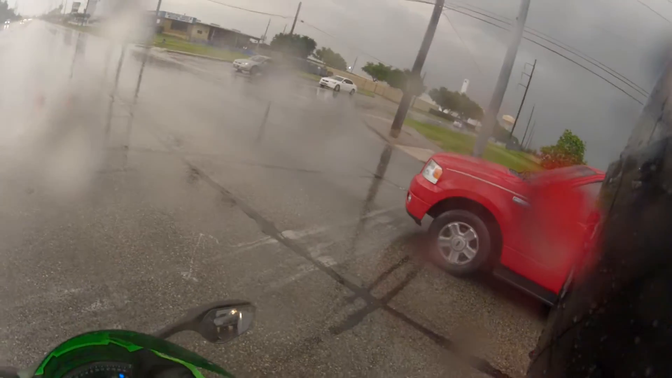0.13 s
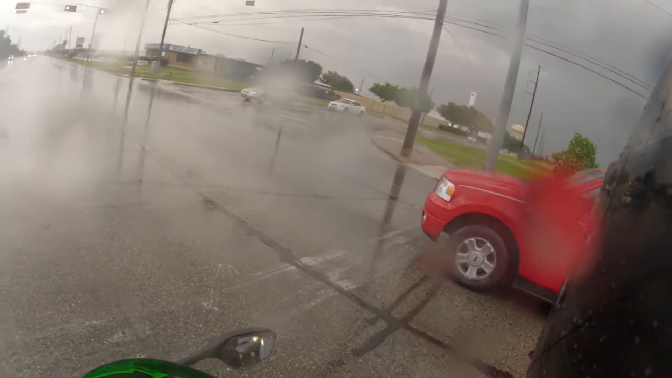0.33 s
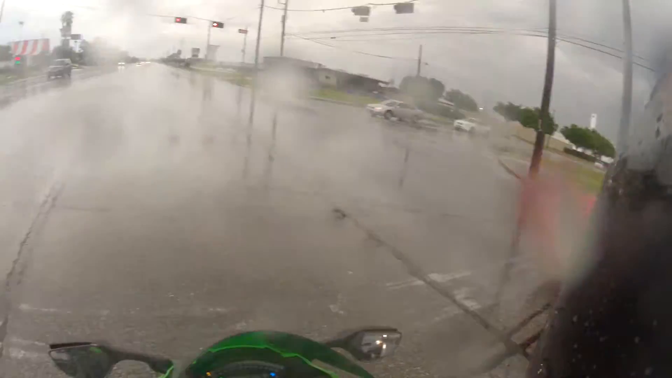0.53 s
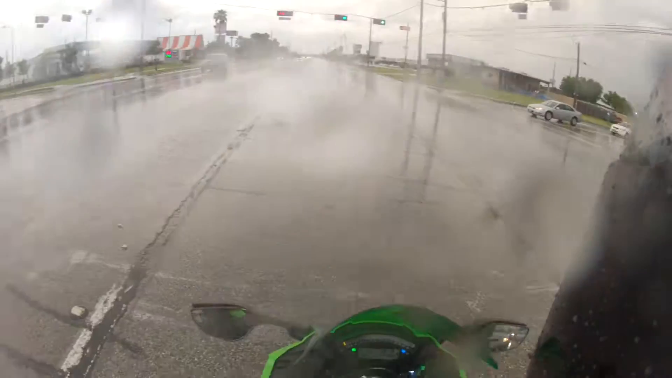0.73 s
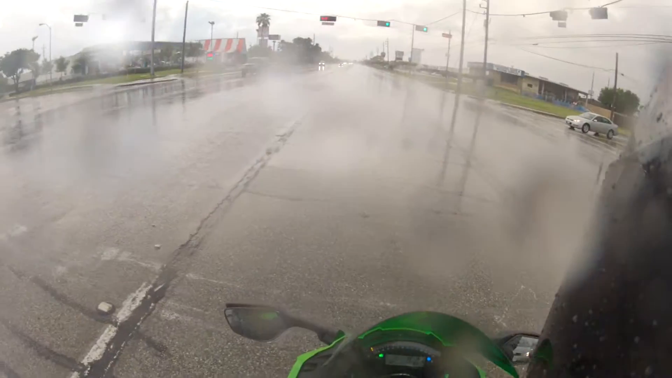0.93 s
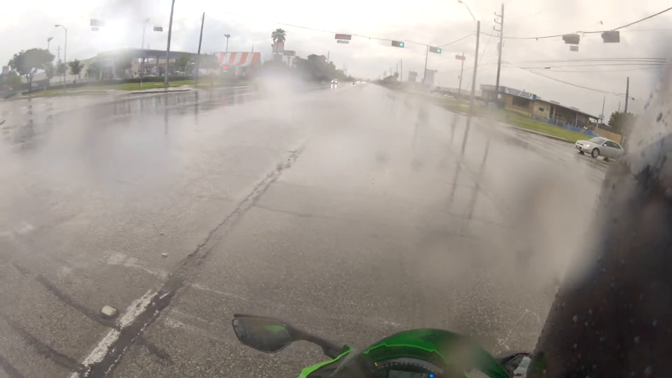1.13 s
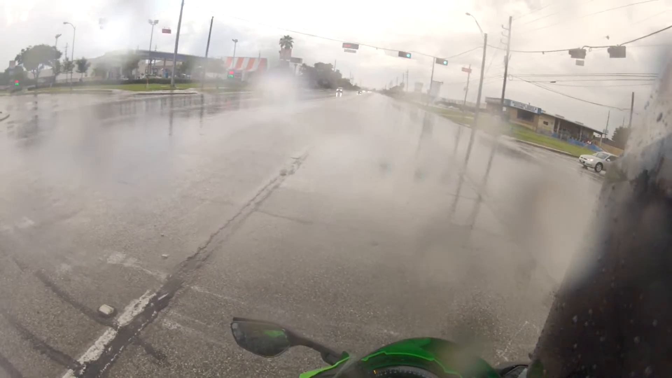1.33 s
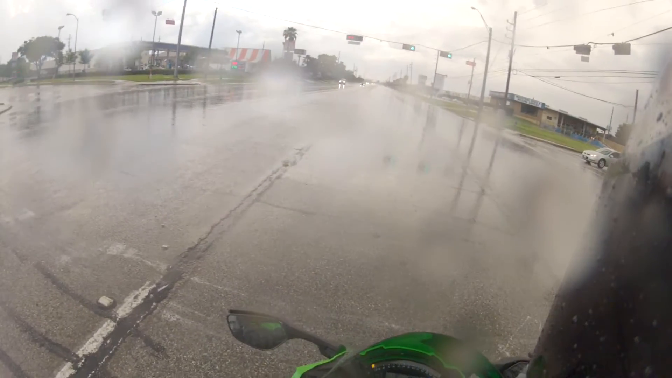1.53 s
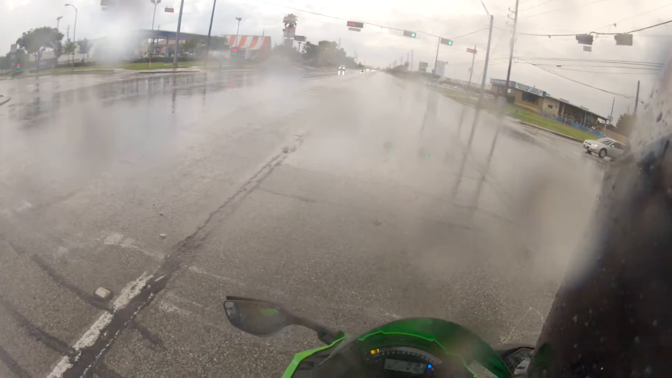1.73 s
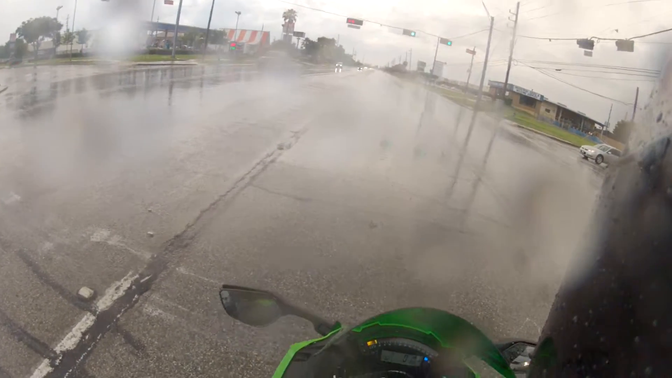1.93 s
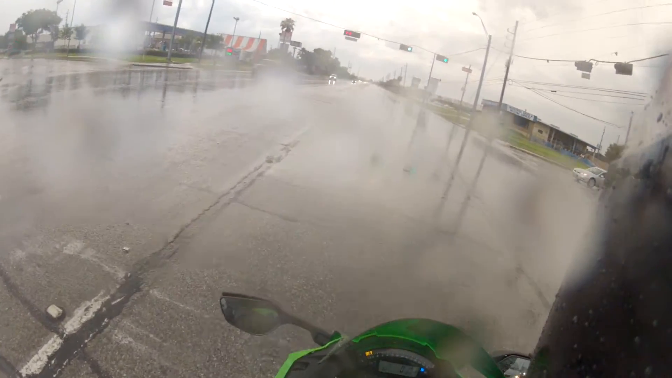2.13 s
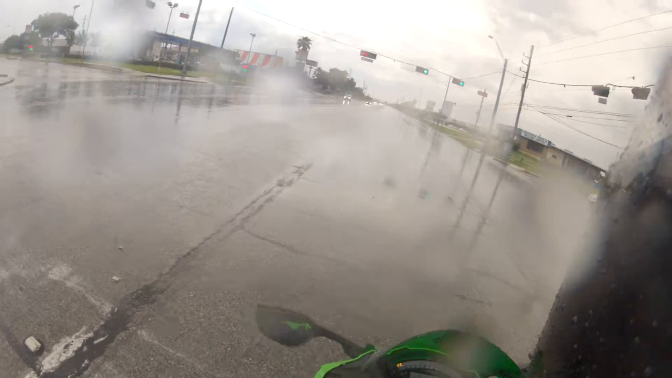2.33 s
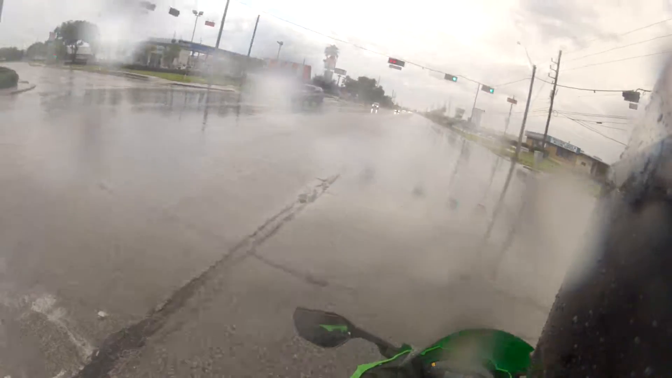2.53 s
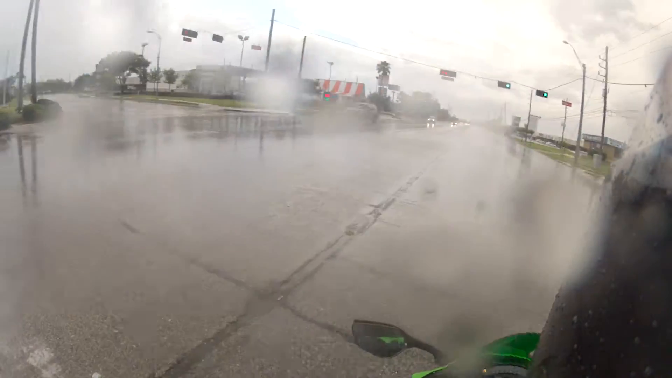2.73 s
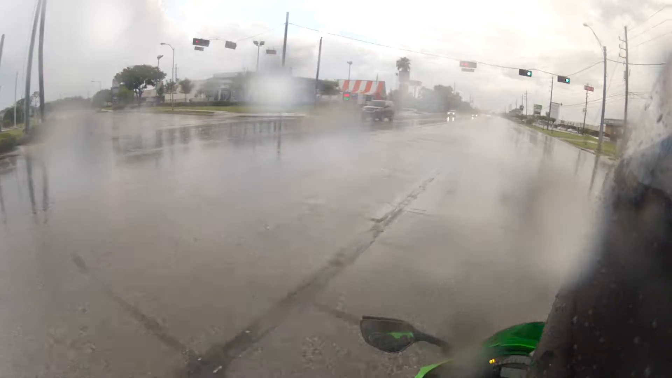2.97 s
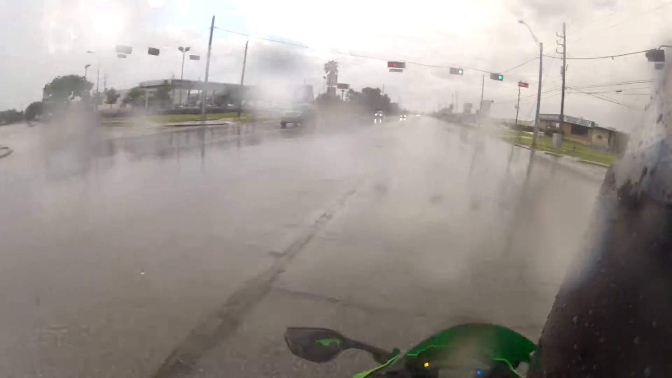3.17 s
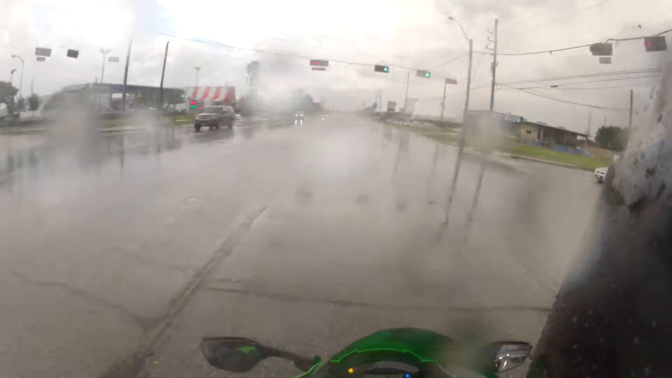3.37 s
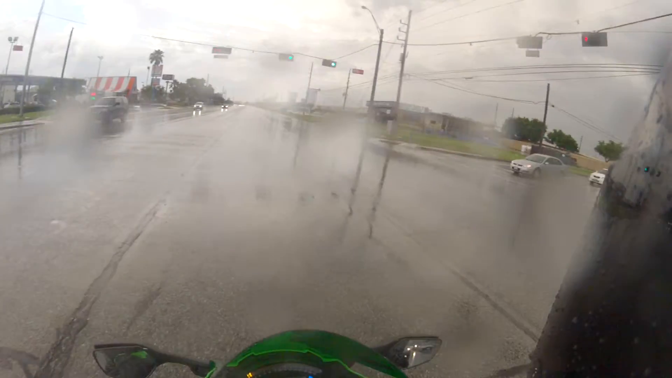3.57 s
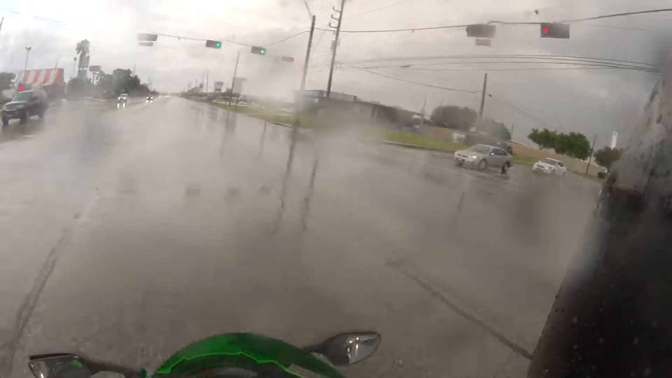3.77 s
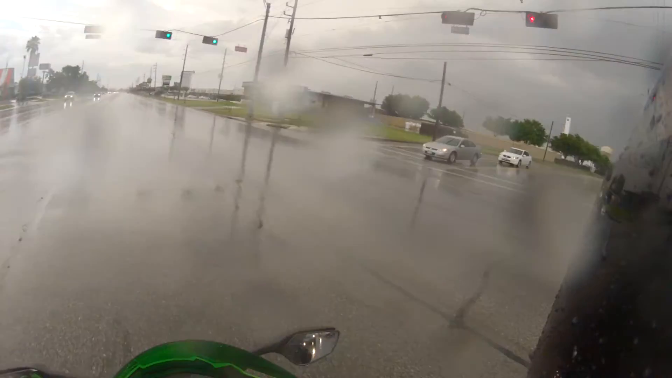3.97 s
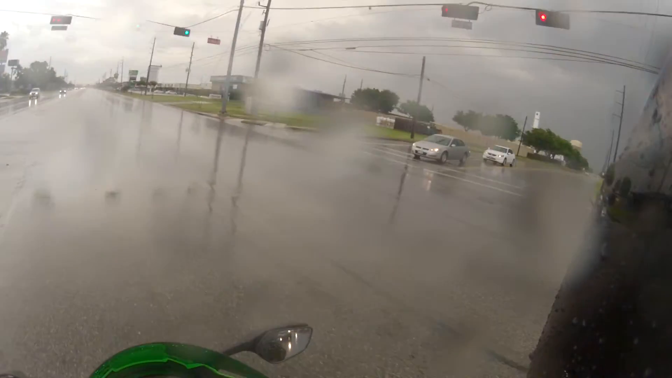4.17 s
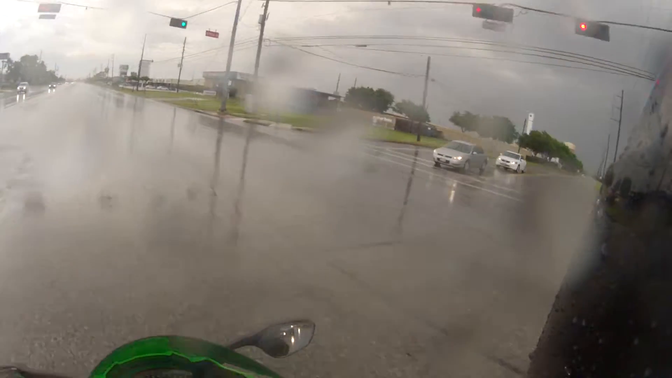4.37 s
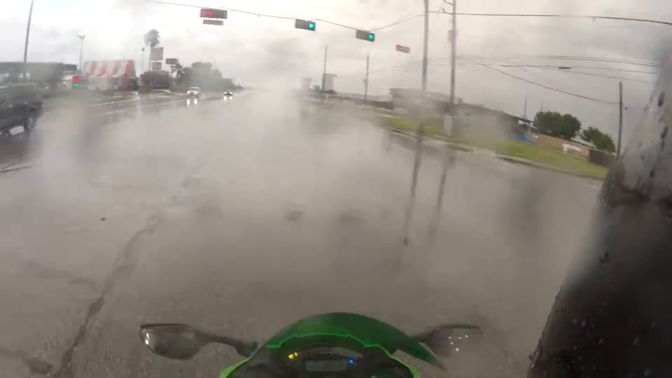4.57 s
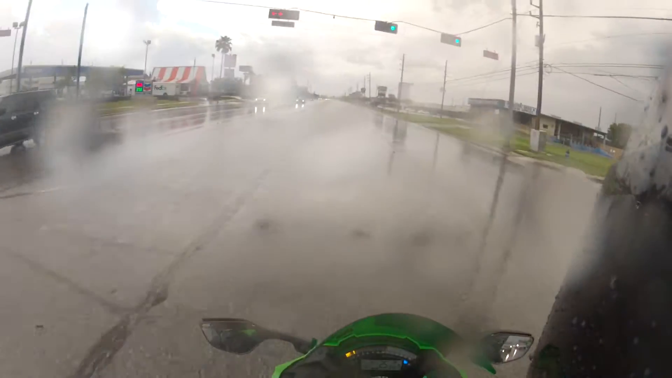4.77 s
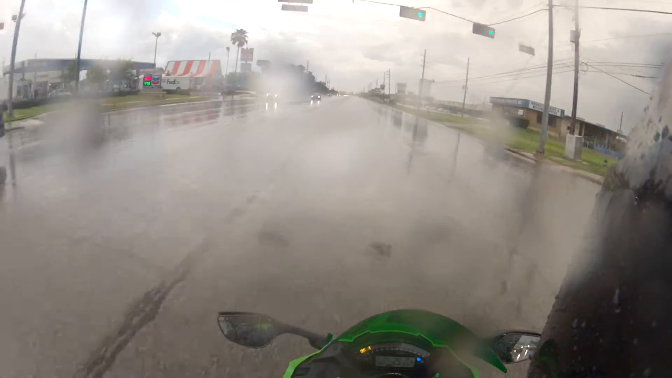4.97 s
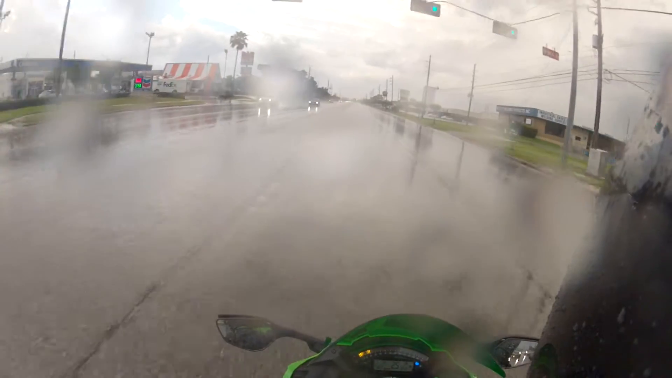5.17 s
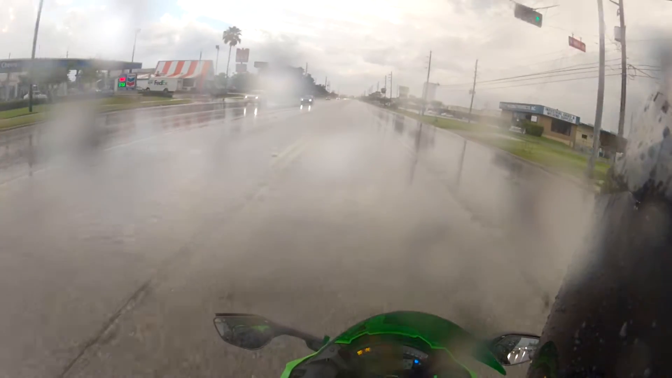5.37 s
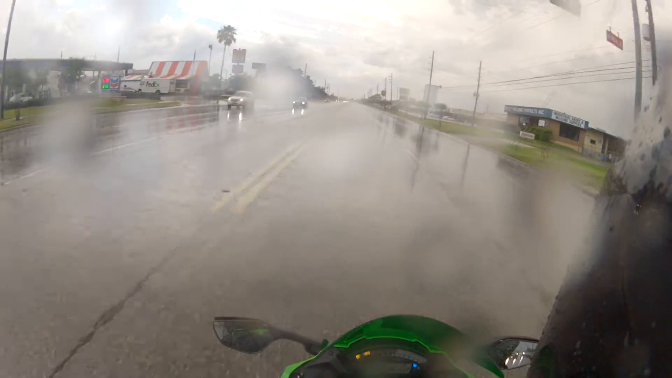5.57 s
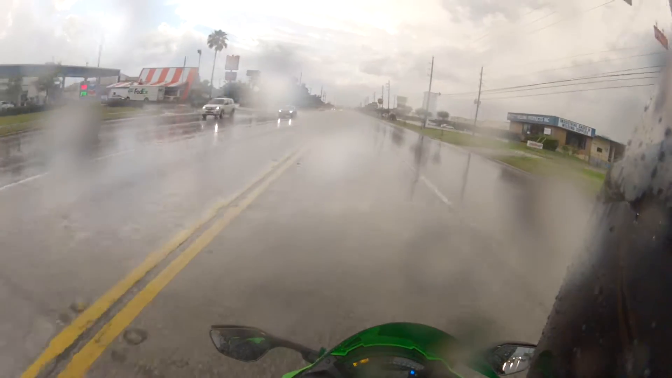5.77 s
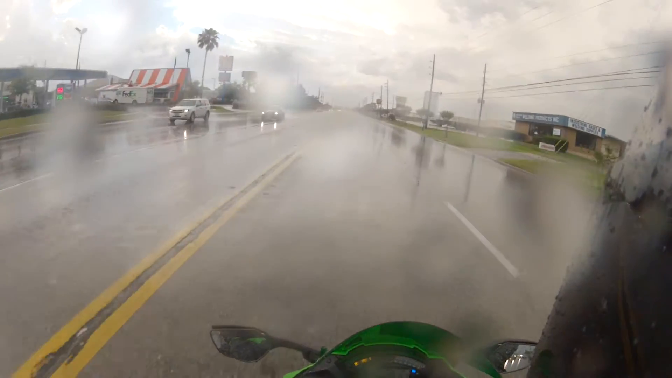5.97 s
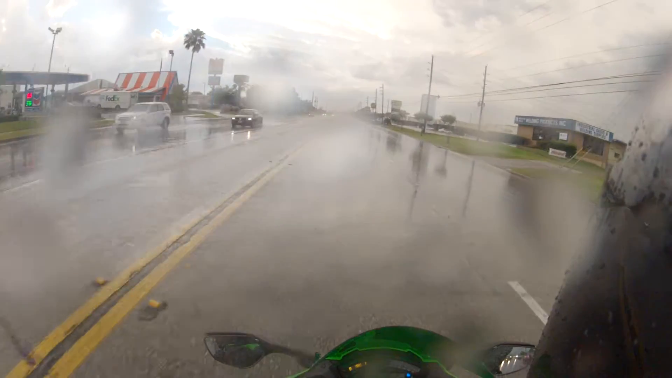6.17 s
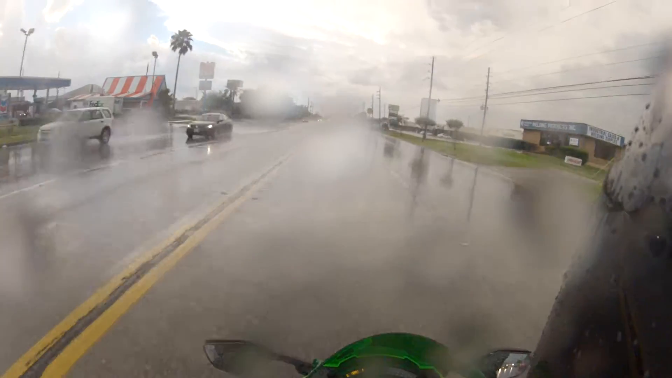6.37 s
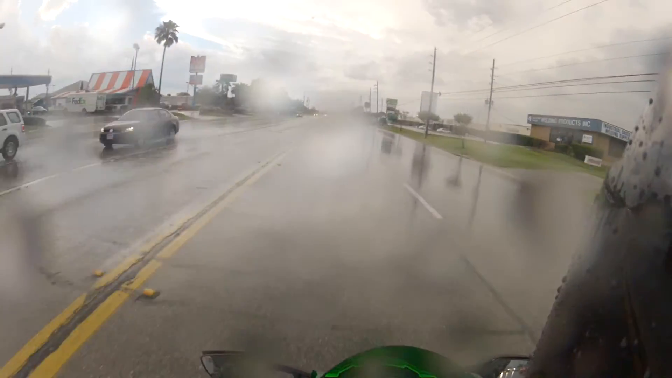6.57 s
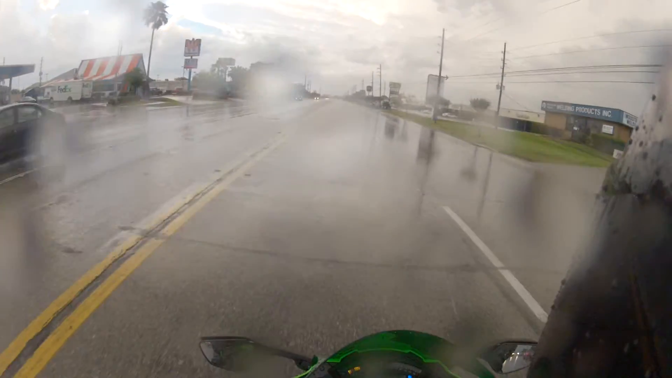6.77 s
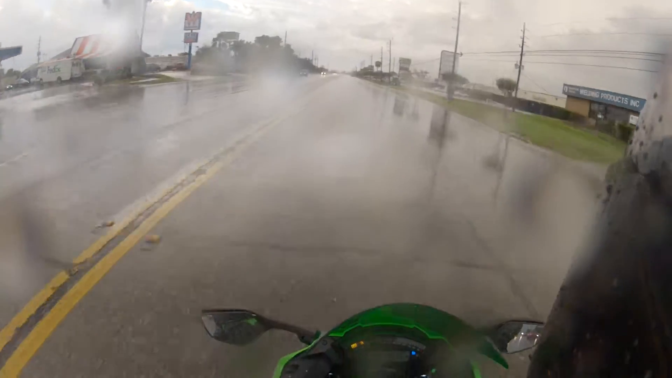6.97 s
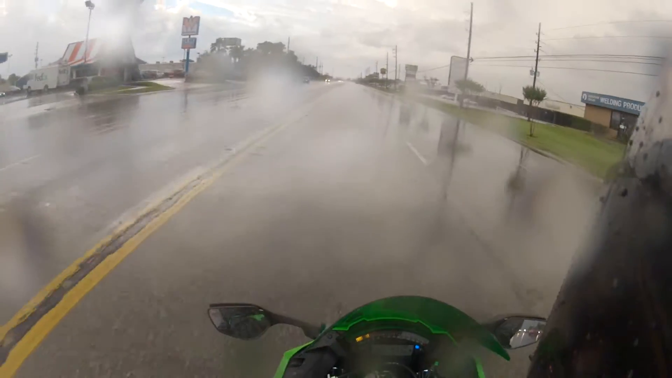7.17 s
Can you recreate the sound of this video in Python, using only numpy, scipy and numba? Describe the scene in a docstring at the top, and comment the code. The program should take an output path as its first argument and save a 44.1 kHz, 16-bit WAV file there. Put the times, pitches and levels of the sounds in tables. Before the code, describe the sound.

Close, enclosed sound from a camera case on a motorcyclist's helmet in rain. From 0 to 1.5 s a four-cylinder engine idles low and soft, thudding unevenly under faint rain hiss and tiny plastic ticks, with one sharp drop smack at 1.0 s. At 1.6 s the engine blips up, peaks near 1.9 s, then sinks by 2.5 s to a steady low growl as the bike creeps off. From 3.9 s it pulls hard, pitch climbing continuously to 6.6 s with a raspy intake edge, thinning briefly around 6.2 s. Pitch drops at the gear change, about 6.6 to 6.9 s, then rises again until the end. Wet tyre hiss brightens and low wind buffets in gusts from 4.7 s. Hard raindrops crack and thump on plastic at 4.6, 4.8, 5.1, 5.4, 6.1, 6.5, 6.7 and 7.2 s, the strongest distorting and momentarily ducking everything.

```python
"""A four-cylinder sport motorcycle idles in the rain, revs, pulls away on a wet road and changes gear.
Firing pulses ring the exhaust pipe, over a sine firing note and intake tones.
Filtered noise makes rain, tyre spray and wind; decaying sines and splash noise make drops on plastic.
The microphone sits in a camera's plastic case on the rider's helmet.
The hardest drops overload it, and a limiter ducks everything for a moment."""
import sys
import numpy as np
from scipy import signal
from scipy.fft import rfft, irfft
from scipy.io import wavfile
from scipy.ndimage import uniform_filter1d
from numba import njit

SR = 44100
rng = np.random.default_rng(int(sys.argv[2]) if len(sys.argv) > 2 else 0)


def output_pcm(signal):
    """Save a mono or channel-first signal as 16-bit PCM at the path in sys.argv[1].

    Samples are clipped to [-1, 1] before scaling.
    """
    pcm = np.clip(np.atleast_2d(signal).T, -1, 1) * 32767
    wavfile.write(sys.argv[1], SR, np.round(pcm).astype(np.int16))


N = 317961

TIME = np.arange(N) / SR  # s
TAPS = 8192
GRID = np.fft.rfftfreq(TAPS, 1 / SR)  # filter design grid, Hz
CRUISE_HZ = 80  # reference firing rate

# camera case resonances and hollows: centre_hz, half_height_width_hz, level_db
CASE_MODES = [(855, 116, -7.5), (1002, 210, 4), (1248, 137, 5.5), (1370, 214, -4), (1640, 150, 1),
              (2084, 580, 5), (2432, 230, 3.5), (3316, 96, -11.5), (3694, 450, 3.5), (5205, 170, 5.5)]


def amp(db):
    """Decibels to gain."""
    return 10 ** (np.asarray(db) / 20)


def unit(x):
    """Scales to rms 1."""
    return x / np.sqrt(np.mean(x ** 2) + 1e-20)


def curves(rows):
    """Columns of a time table, interpolated at every sample."""
    s, *columns = np.transpose(rows)
    return [np.interp(TIME, s, c) for c in columns]


def swell(middle_s, length_s):
    """Bell in time, height 1; length is taken at half height."""
    return .5 ** ((2 * (TIME - middle_s) / length_s) ** 2)


def slope(points):
    """Spectrum in dB, joined on a log-frequency axis."""
    hz, db = np.transpose(points)
    return np.interp(np.log(GRID + 1), np.log(hz), db)


def bumps(rows):
    """Spectrum in dB: a sum of bell-shaped peaks and hollows."""
    return sum(db * .5 ** ((2 * (GRID - hz) / width_hz) ** 2) for hz, width_hz, db in rows)


def colour(x, db):
    """Causal minimum-phase filter: it rings after a blow, never before."""
    log_gain = np.log(amp(np.maximum(db, -100)))
    circle = np.concatenate([log_gain, log_gain[-2:0:-1]])
    response = np.fft.ifft(np.exp(signal.hilbert(circle).conj())).real
    return signal.oaconvolve(x, response[:TAPS // 2])[:len(x)]


def wander(rate_hz):
    """Low-passed noise of rms 1, rolling off around the given rate."""
    hz = np.fft.rfftfreq(N, 1 / SR)
    spectrum = rfft(rng.standard_normal(N)) / (1 + (hz / rate_hz) ** 4)
    return unit(irfft(spectrum, N))


def steadied(x):
    """Holds the rms at 1 over a third of a second, keeping all faster throbbing."""
    power = uniform_filter1d(x ** 2, size=SR // 3)
    return x / np.sqrt(abs(power) + 1e-12)


def revs(flywheel_s=.07):
    """Firings per second; the flywheel rounds every change."""
    # idle, blip, slipping clutch, long pull, gear change: time_s, firing_hz
    rev_points = [(1.54, 44), (1.68, 85), (1.8, 114), (1.93, 122), (2.07, 115), (2.3, 87), (2.5, 78),
                  (2.76, 78), (2.95, 82), (3.28, 78), (3.58, 81.5), (3.85, 80.3), (4.35, 95), (4.88, 117),
                  (5.06, 121), (5.5, 141.6), (5.86, 161), (6.6, 178), (6.86, 155), (7.21, 165)]
    return uniform_filter1d(curves(rev_points)[0], size=round(flywheel_s * SR))


def off_idle(idle_hz=45, open_hz=76):
    """0 while the engine idles, 1 once it has picked up."""
    return np.clip((revs() - idle_hz) / (open_hz - idle_hz), 0, 1)


def throttle(open_s=0.39, close_s=0.12):
    """Throttle 0-1: ramps open and closed for the long pull and after the gear change; the blip adds none."""
    # throttle openings, 0 for the blip: opens_s, closes_s, opening (0-1)
    openings = [(1.574, 1.95, 0), (3.87, 6.55, 1.0), (6.78, 7.3, 0.9)]
    total = 0
    for opens_s, closes_s, opening in openings:
        rise = np.clip((TIME - opens_s) / open_s, 0, 1)
        fall = np.clip(1 - (TIME - closes_s) / close_s, 0, 1)
        total = total + opening * rise * fall
    return total


def intake(turns, firing_hz):
    """Each intake tone flares as the revs carry it through an airbox resonance."""
    # intake tones: firing_rate_multiple, level_db
    orders = [(2.5, -5), (3, -3), (3.5, 0), (4.5, 0), (5, -5), (5.5, -12), (6.5, -8), (7.5, -5), (8.5, -6)]
    # airbox response: frequency_hz, level_db
    airbox = [(200, 0), (295, -14), (370, -13.5), (420, -10), (460, -3), (495, -10), (540, -18), (610, -10),
              (670, -7), (760, -9), (860, -24), (1400, 2)]
    box_db = slope(airbox)
    tones = np.zeros(N)
    for k, db in orders:
        gain = amp(db + np.interp(k * firing_hz, GRID, box_db))
        tones += gain * np.sin(2 * np.pi * (k * turns + rng.random()))
    return np.sqrt(2) * tones


def engine(waver=.0015, idle_waver=.06, thud_db=-1, lope_hz=4.98, lope_db=1.0, puff_db=-2,
           uneven_running=0.069, uneven_idle=0.51, thud_running=0.04):
    """One pulse a firing, from four unequal cylinders, rings the exhaust over the smooth firing note."""
    # the four cylinders: pulse_strength_db, header_delay_s
    cylinders = [(3.5, .0001), (-1, 0.00018), (0.5, .00012), (2.4, 0.00033)]
    # exhaust pipe response: frequency_hz, level_db
    pipe = [(20, -23), (60, -25), (120, -2), (165, 1), (200, -2.5), (245, 5), (325, 3.5), (385, -9),
            (430, -11.5), (485, -9), (545, -14), (620, -12.5), (830, -19), (2500, -30)]
    # soft exhaust thud, strongest at idle: frequency_hz, level_db
    thud_shape = [(20, -22), (55, -12), (85, 0), (115, -0.5), (150, -16), (230, -9.5), (400, -21.5),
                  (900, -35.5)]
    # at cruising revs, change per doubling of revs, added at full throttle, added at idle (dB)
    boom_cruise_db, boom_octave_db, boom_throttle_db, boom_idle_db = -42, 4.5, 3.1, -14
    bark_cruise_db, bark_octave_db, bark_throttle_db, bark_idle_db = -46.5, -5, 7, -10
    intake_cruise_db, intake_octave_db, intake_throttle_db, intake_idle_db = -54, 2.5, 11.5, -18
    # the exhaust dips briefly late in the long pull, before the gear change
    dip_s, dip_length_s, dip_depth_db = 6.2, 0.32, -22
    # the firing note swells at the pipe's lowest resonance
    drone_hz, drone_width_hz, drone_rise_db = 167, 30, 3

    firing_hz, running, load = revs(), off_idle(), throttle()
    idling, octaves = 1 - running, np.log2(firing_hz / CRUISE_HZ)
    dip_db = dip_depth_db * swell(dip_s, dip_length_s)
    drone_db = drone_rise_db * .5 ** ((2 * (firing_hz - drone_hz) / drone_width_hz) ** 2)
    boom_db = boom_cruise_db + boom_octave_db * octaves + boom_throttle_db * load
    boom_db = boom_db + boom_idle_db * idling ** 2 + dip_db + drone_db
    pipe_db = bark_cruise_db + bark_octave_db * octaves + bark_throttle_db * load
    pipe_db = pipe_db + bark_idle_db * idling ** 2 + dip_db
    intake_db = intake_cruise_db + intake_octave_db * octaves + intake_throttle_db * load
    intake_db = intake_db + intake_idle_db * idling

    turns = np.cumsum(firing_hz * (1 + (waver + idle_waver * idling) * wander(12))) / SR
    firings = np.flatnonzero(np.diff(np.floor(turns)))
    strength_db, delay_s = np.resize(cylinders, (len(firings), 2)).T
    # unequal cylinders and headers put growling half-order tones between the harmonics
    arrival = np.clip(firings + np.round(delay_s * SR).astype(int), 0, N - 1)
    uneven = uneven_running + uneven_idle * idling
    pulses = np.zeros(N)
    pulses[arrival] = amp(strength_db) * (1 + uneven[firings] * rng.standard_normal(N)[:len(firings)])
    bark = np.sqrt(running) * steadied(colour(pulses, slope(pipe)))

    # at idle only thuds and puffs, loping slowly; a little stays under the bark
    puffs = unit(pulses) + amp(puff_db) * rng.standard_normal(N)
    lope = amp(thud_db + lope_db * np.cos(2 * np.pi * lope_hz * TIME))
    thud_share = np.sqrt(idling + abs(thud_running) * running)
    thud = thud_share * lope * steadied(colour(puffs, slope(thud_shape)))

    boom = np.sqrt(2) * np.sin(2 * np.pi * turns) * amp(boom_db + 0.9 * wander(15.0))
    return boom + amp(pipe_db) * (bark + thud) + amp(intake_db) * intake(turns, firing_hz)


def pace(set_off_s=1.6, full_speed_m_per_s=15):
    """Road speed as a share of the full-speed reference."""
    # road speed after setting off: time_s, speed_m_per_s
    speeds = [(2.4, 1.6), (3.35, 3.47), (3.7, 5.54), (4.4, 7.27), (5.0, 10.25), (5.6, 11.7), (6.25, 14.93),
              (6.65, 15.3), (7.21, 13.84)]
    return np.maximum(curves([(set_off_s, 0)] + speeds)[0], 0) / full_speed_m_per_s


def hiss_level(rain_db=-51.5, whirr_db=-48.5, whirr_power=1.3, tyres_db=-24.5, tyres_power=1.85):
    """Steady rain, engine whirr (set at cruising revs) and tyres (set at full speed) add their power."""
    whirr = amp(whirr_db) * off_idle() * (revs() / CRUISE_HZ) ** whirr_power
    tyres = amp(tyres_db) * pace() ** tyres_power
    return np.sqrt(amp(rain_db) ** 2 + whirr ** 2 + tyres ** 2)


def patter(ticks_per_s=45, spread_db=5.0, level_re_hiss_db=-12, t60_s=0.018):
    """Small drops, each ringing one resonance of the case."""
    t = np.arange(SR // 30) / SR
    modes_hz = [hz for hz, width_hz, db in CASE_MODES if db > 0 and hz < 4000]
    out = np.zeros(N)
    for hz in modes_hz:
        hits = rng.random(N) < ticks_per_s / len(modes_hz) / SR
        sizes = amp(spread_db * np.minimum(rng.exponential(1, N), 3))
        ring = np.sin(2 * np.pi * hz * t) * amp(-60 * t / t60_s)
        out += signal.oaconvolve(hits * sizes, ring)[:N]
    return amp(level_re_hiss_db) * unit(out)


def spray(droplets_per_s=900, spread_db=1.5, droplets_db=-5, flutter_db=1.42,
          lift_rest_db=-1.2, lift_speed_db=5.5):
    """Hiss of rain and wet tyres with a fine patter of droplets; it brightens with speed."""
    # hiss before it reaches the case: frequency_hz, density_db_per_hz
    hiss_shape = [(100, -13.5), (350, -4.5), (600, -5.5), (1000, -0.5), (2000, -1.5), (2800, 0.5),
                  (4300, -12.5), (7000, -11), (10000, -14), (16000, -9)]
    lift_db = lift_rest_db + lift_speed_db * pace()
    sizes = amp(spread_db * np.minimum(rng.exponential(1, N), 4)) * rng.choice([-1, 1], N)
    droplets = unit(sizes * (rng.random(N) < droplets_per_s / SR))
    water = rng.standard_normal(N) * amp(flutter_db * wander(62)) + amp(droplets_db) * droplets
    hiss = unit(colour(water, slope(hiss_shape) + bumps(CASE_MODES)))
    treble = signal.sosfilt(signal.butter(1, 4000, "high", fs=SR, output="sos"), hiss)
    return hiss_level() * (hiss + (amp(lift_db) - 1) * treble + patter())


def wind(lumps_db=2, breeze_db=-61.5, full_speed_db=-30.5, speed_power=1.42):
    """Eddies off the helmet buffet the case in lumps, harder with speed and in gusts."""
    # buffeting: frequency_hz, density_db_per_hz
    buffet = [(12, -35), (25, -18), (39, -3.5), (62, -15), (90, -11), (125, -2), (160, -0.5), (215, -14),
              (320, -17), (500, -39), (800, -32.5), (2000, -44)]
    # gusts: middle_s, length_s, rise_db
    gusts = [(4.743, .16, 8.5), (4.98, .14, 4), (5.32, .14, 4), (5.78, 0.1388, 4), (6.32, 0.26, 7),
             (7.11, .14, 6)]
    gust_db = sum(db * swell(middle_s, length_s) for middle_s, length_s, db in gusts)
    level = np.hypot(amp(breeze_db), amp(full_speed_db + gust_db) * pace() ** speed_power)
    noise = colour(rng.standard_normal(N), slope(buffet))
    return level * unit(noise * amp(lumps_db * wander(31)))


def light_drops(rest_per_s=3.2, speed_per_s=6, rest_db=-45, speed_db=21.5, scatter_db=3.5,
                low_hz=1100, high_hz=2890, press_s=0.0019):
    """Random light drops, more often and harder with speed, as rows like those of the heavy drops."""
    chance, size, place = rng.random((3, N))
    hits = np.flatnonzero(chance < (rest_per_s + speed_per_s * pace()) / SR)
    db = rest_db + speed_db * pace()[hits] + scatter_db * (2 * size[hits] - 1)
    hz = low_hz * (high_hz / low_hz) ** place[hits]
    return list(zip(TIME[hits], db, hz, np.full(len(hits), press_s)))


def drops(t60_s=0.0094, splash_db=-5.5, rise_s=0.00018, linger_db=-24, linger_t60_s=0.041, sag=0.2,
          rattle=0.54, snap_hz=3700, snap_db=-12, knock_hz=1230, knock_db=-11, stiff_hz=830):
    """Each drop rings the patch of case it lands on, and its splash stirs all the other resonances."""
    # heavy drops: start_s, strength_db, mid_slide_ring_hz, press_s
    heavy_drops = [(.024, -35, 1320, 0.0011), (.235, -35.5, 2330, 0.0011), (.824, -41.5, 1050, 0.0046),
                   (0.9918, -8, 2287, 0.0012), (1.0063, -31.5, 1690, .0023), (1.161, -39.5, 2202, .012),
                   (1.1665, -34.5, 2270, 0.0012), (1.375, -39, 1170, 0.0021), (1.8443, -24, 2280, 0.0037),
                   (1.908, -35.5, 1002, 0.0048), (1.964, -32.5, 1350, 0.0021), (2.555, -28, 3200, .0023),
                   (2.9554, -26, 1610, 0.0051), (3.325, -27.5, 2382, .001), (3.749, -25, 2290, .001),
                   (3.816, -28.5, 1670, 0.0018), (3.925, -30, 2080, 0.0012), (3.973, -27.5, 3330, 0.0014),
                   (3.997, -15, 2370, 0.0017), (4.137, -31.5, 1087, 0.0019), (4.376, -12.5, 2233, 0.00093),
                   (4.392, -19, 2190, 0.0023), (4.6395, -2, 2084, .0013), (4.8021, 3.5, 2310, 0.0026),
                   (5.089, -7, 2146, .0014), (5.4424, 9.5, 2314, 0.0023), (6.068, -3.5, 2080, 0.0014),
                   (6.317, -14.5, 2400, .001), (6.452, -5, 2420, 0.0015), (6.645, 3, 2150, 0.0019),
                   (6.7543, 3.5, 1060, 0.0012), (6.756, 1, 1900, 0.0022), (7.152, -7, 2153, 0.0013),
                   (7.18, -7.5, 2980, 0.0015)]
    # splash: frequency_hz, density_db_per_hz
    splash_shape = [(100, -92), (500, 0.5), (1000, -4.5), (2200, -4.5), (3000, -7), (4500, -20.5),
                    (9000, -9.5), (16000, -11)]
    t = np.arange(SR // 20) / SR
    rings, splashes = np.zeros((2, N + len(t)))
    grit = rng.standard_normal(N + len(t))
    shake = np.resize(wander(950), N + len(t))
    # the whole case answers with a high snap and a low knock wherever the drop lands
    snap = amp(snap_db) * np.sin(2 * np.pi * snap_hz * t)
    knock = amp(knock_db) * np.sin(2 * np.pi * knock_hz * t)
    for start_s, db, hz, press_s in heavy_drops + light_drops():
        start = round(start_s * SR)
        span = slice(start, start + len(t))
        decay = amp(db - 60 * np.maximum(t - press_s, 0) / t60_s)
        force = decay * (1 - np.exp(-t / rise_s))
        linger = amp(db + linger_db - 60 * t / linger_t60_s)
        # the spreading water loads the plastic, so the ring slides down and shakes
        ring_hz = hz * (1 + sag * (np.exp(-t / press_s) - .5))
        ring = np.sin(2 * np.pi * np.cumsum(ring_hz) / SR) + snap + knock
        rings[span] += force * ring * (1 + rattle * shake[span])
        splashes[span] += (force + linger) * grit[span]
    body_db = slope(splash_shape) + bumps(CASE_MODES)
    body_db -= 10 * np.log10(np.mean(amp(body_db) ** 2))
    # the small stiff case gives off no bass
    stiff = signal.butter(N=3, Wn=stiff_hz, btype="high", fs=SR, output="sos")
    return signal.sosfilt(stiff, rings + amp(splash_db) * colour(splashes, body_db))[:N]


def scene():
    """Everything that reaches the one microphone."""
    return (engine() + spray() + wind() + drops())[None]


@njit
def limiter_db(x, threshold, fall, recovery):
    """Gain in dB that falls fast while the held peak is over the threshold and creeps back afterwards."""
    gain, out = 0., np.zeros(len(x))
    held = 0.
    for i in range(len(x)):
        held = max(abs(x[i]), held * .98)
        if held * 10 ** (gain / 20) > threshold:
            gain -= fall
        else:
            gain = min(gain + recovery, 0.)
        out[i] = gain
    return out


def record(dry, threshold_db=-7.5, fall_db_per_s=3500, recovery_db_per_s=115, ceiling=0.59,
           off_centre=0.67, edge_hz=16000):
    """Limiter, overload, a fixed treble colour and the band limit."""
    # fixed treble peaks and hollows of the sound: centre_hz, half_height_width_hz, level_db
    treble_shape = [(6030, 496, -15), (7470, 770, -6.5), (9660, 580, 6), (12115, 1810, -27),
                    (14450, 700, -1.5), (16080, 1300, -38)]
    x = dry[0]
    duck_db = limiter_db(x, float(amp(threshold_db)), fall_db_per_s / SR, recovery_db_per_s / SR)
    # overload pushes the microphone off centre, turning the hardest drops into low thumps
    overload = uniform_filter1d(np.maximum(abs(x) - ceiling, 0), size=SR // 1500)
    x = (x + off_centre * overload) * amp(duck_db)
    x = x / (1 + (x / ceiling) ** 4) ** .25  # soft clip
    x = colour(x, bumps(treble_shape))
    low_pass = signal.firwin(511, edge_hz, window=("kaiser", 9), fs=SR)
    return signal.oaconvolve(x, low_pass, "same")[None]


dry = scene()
out = record(dry)
output_pcm(out)
```